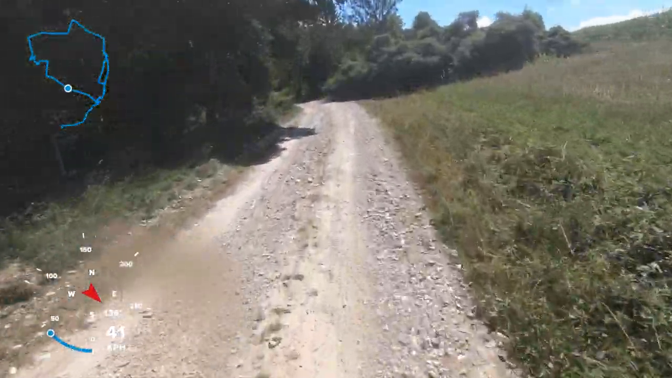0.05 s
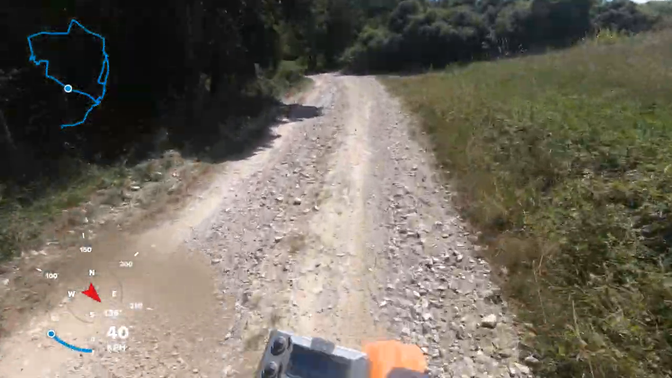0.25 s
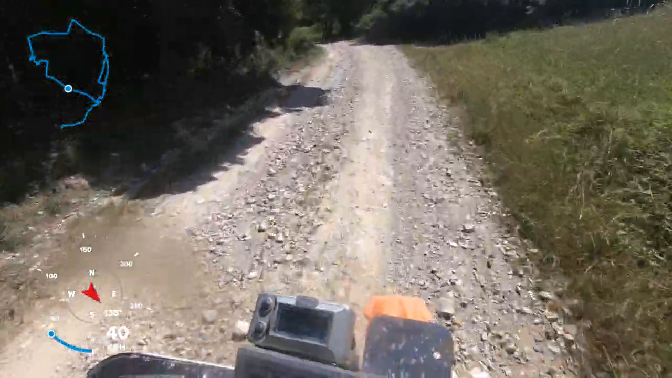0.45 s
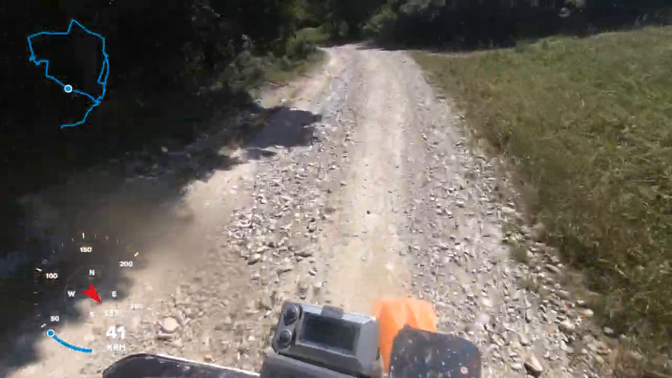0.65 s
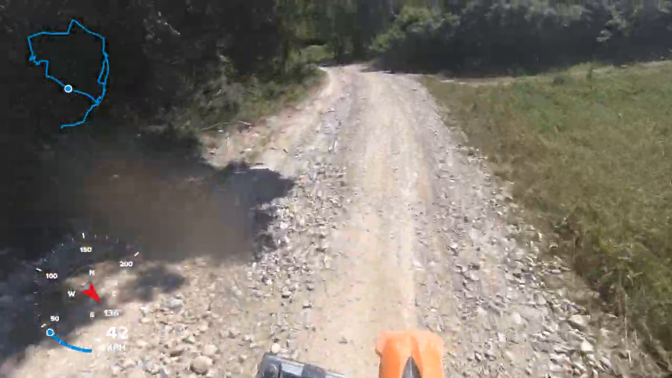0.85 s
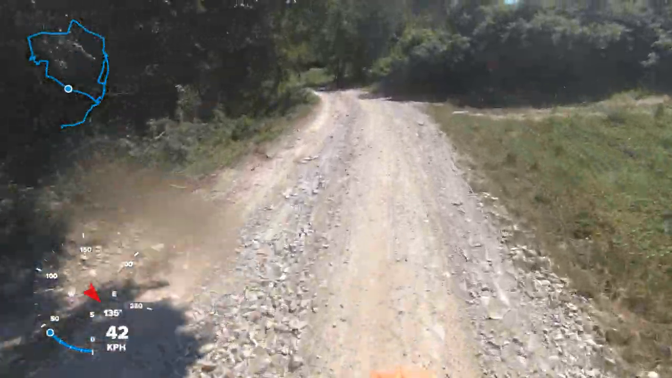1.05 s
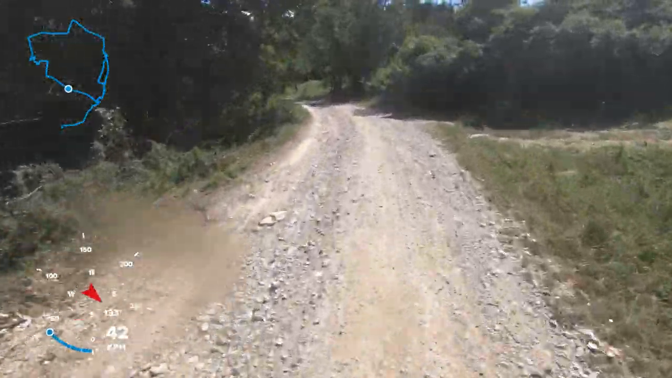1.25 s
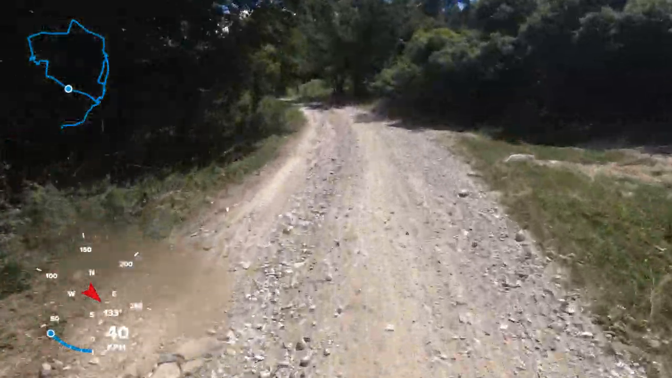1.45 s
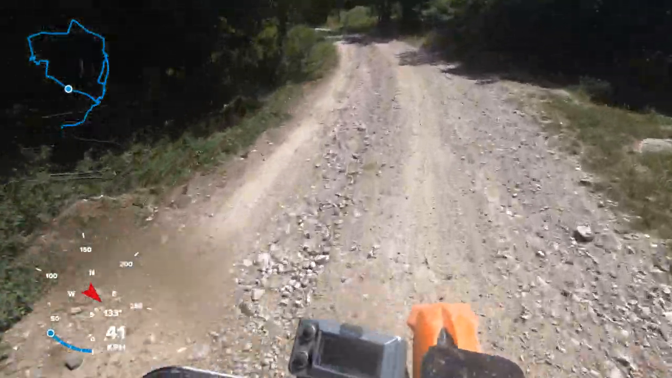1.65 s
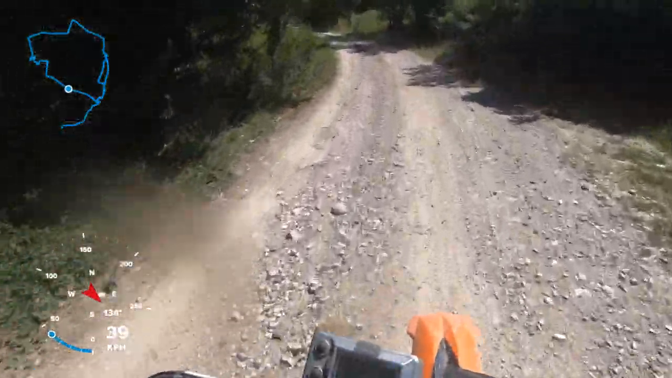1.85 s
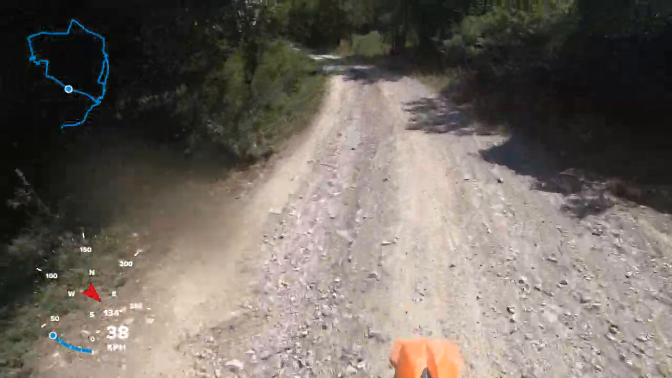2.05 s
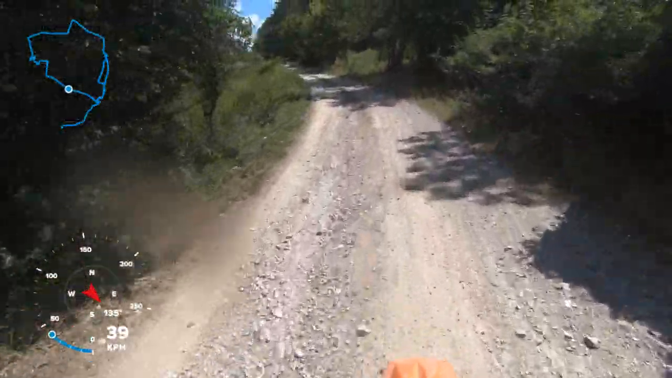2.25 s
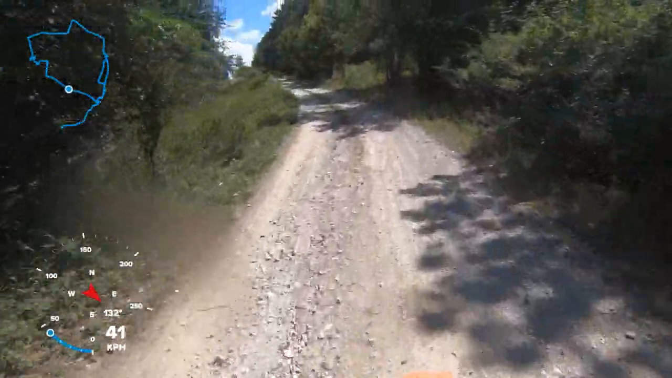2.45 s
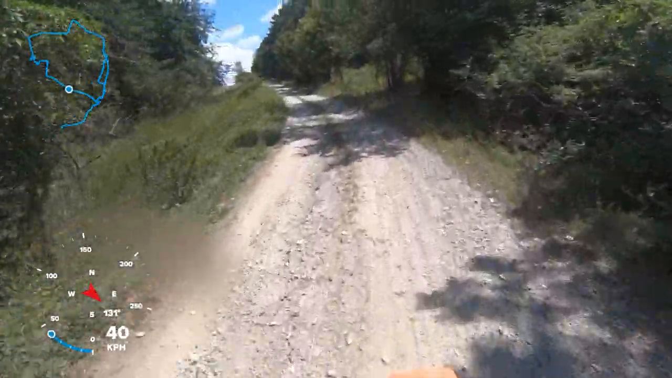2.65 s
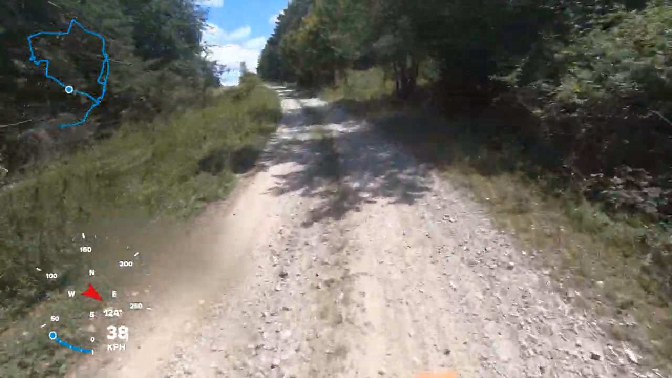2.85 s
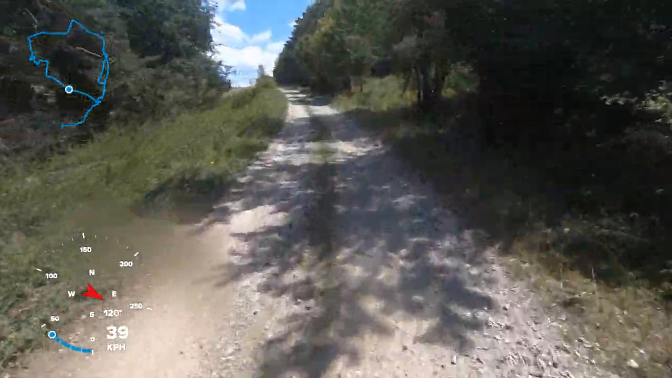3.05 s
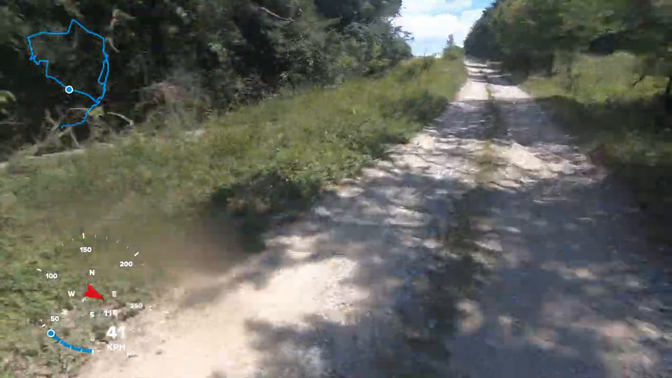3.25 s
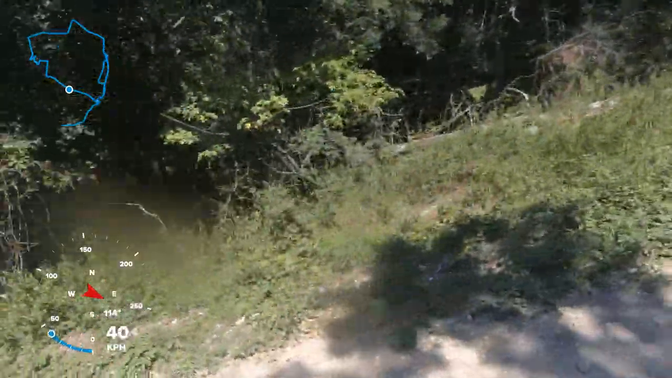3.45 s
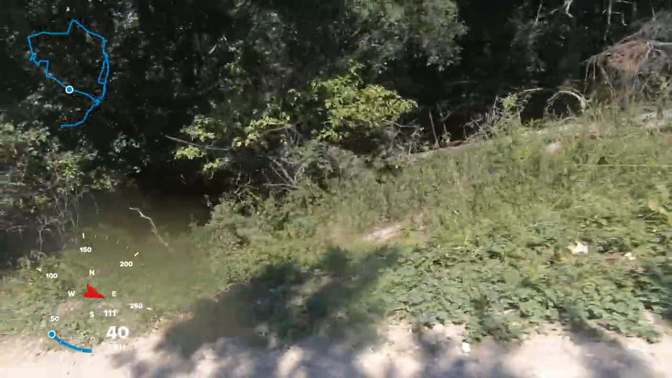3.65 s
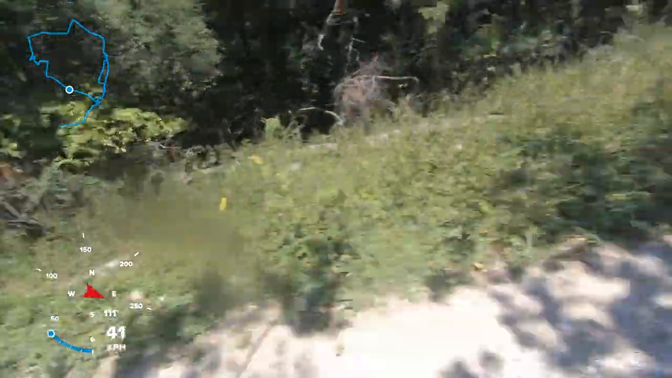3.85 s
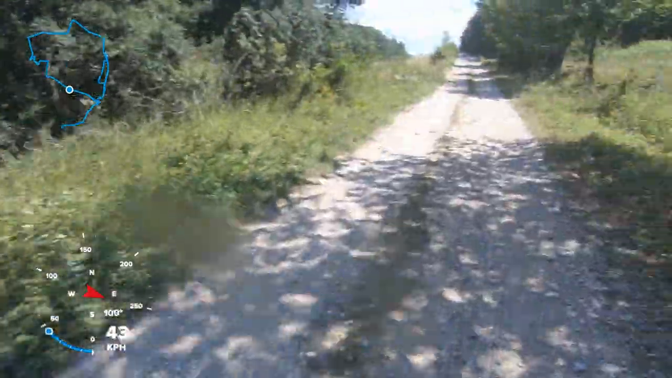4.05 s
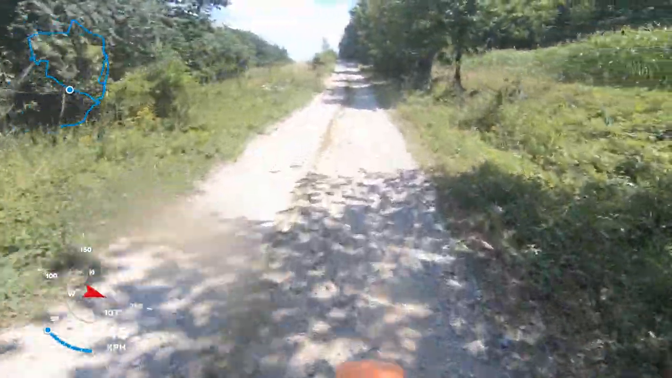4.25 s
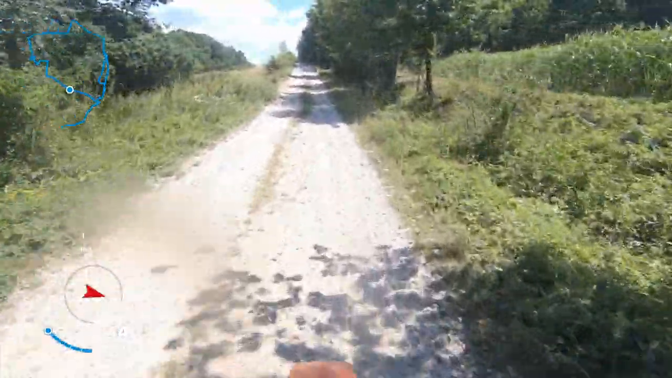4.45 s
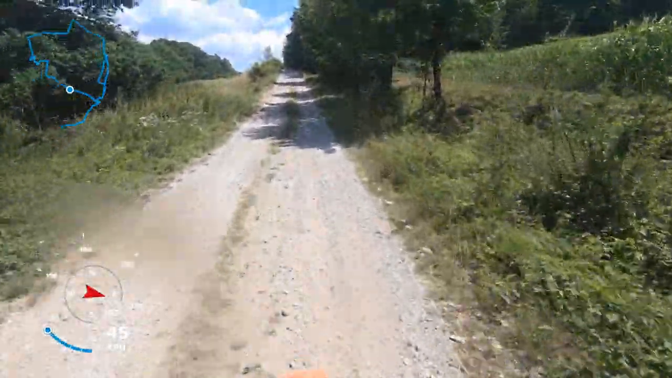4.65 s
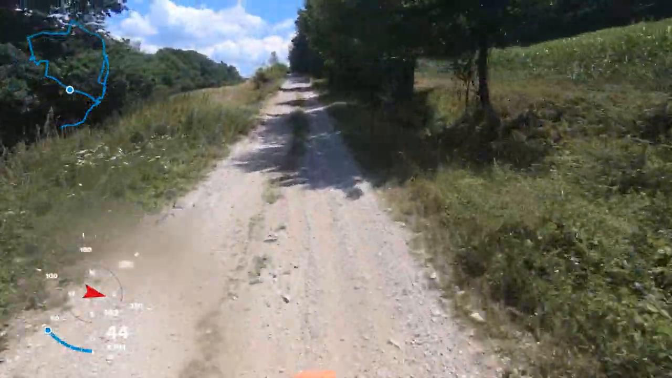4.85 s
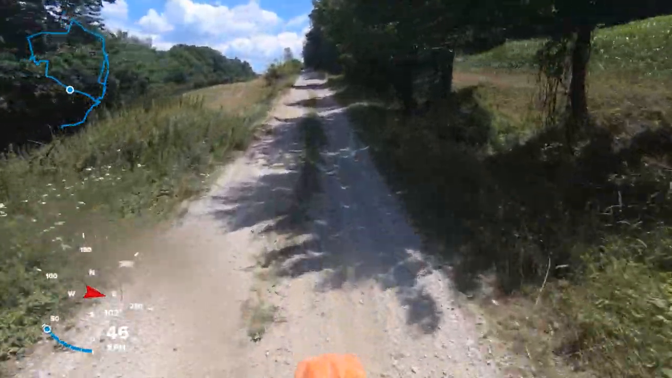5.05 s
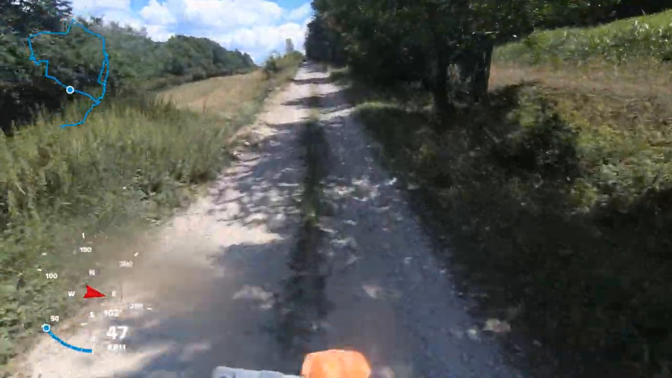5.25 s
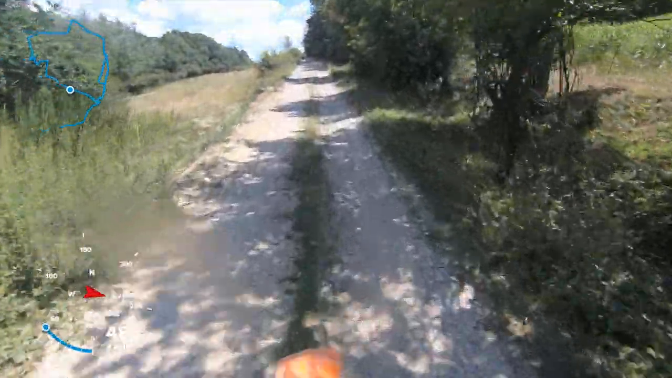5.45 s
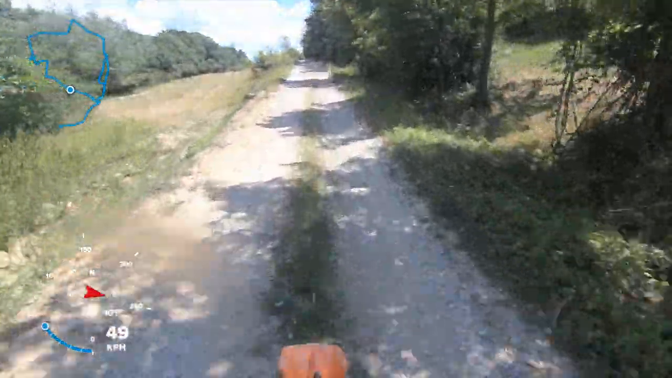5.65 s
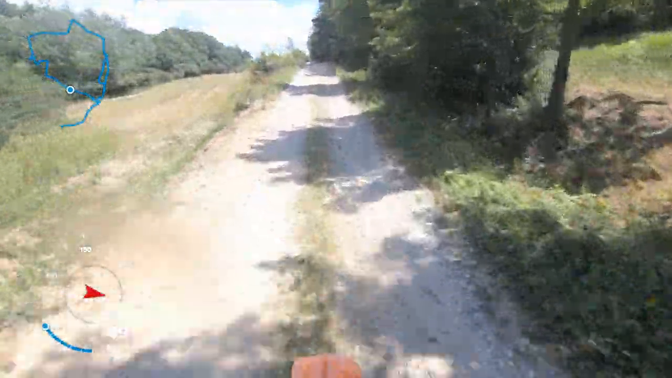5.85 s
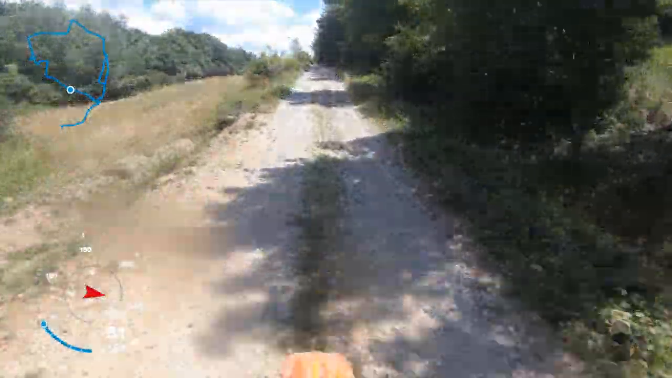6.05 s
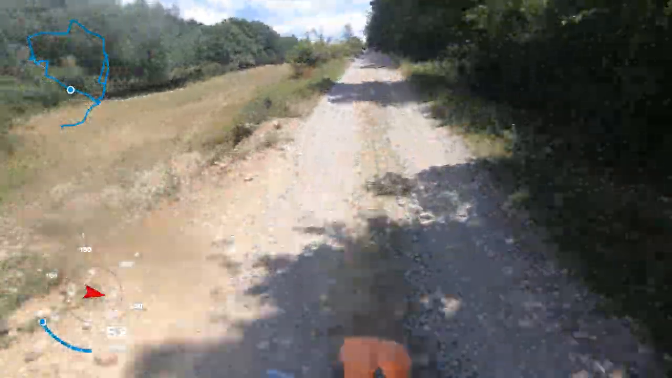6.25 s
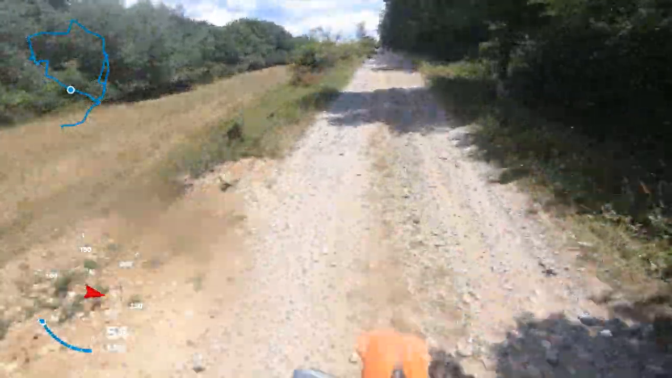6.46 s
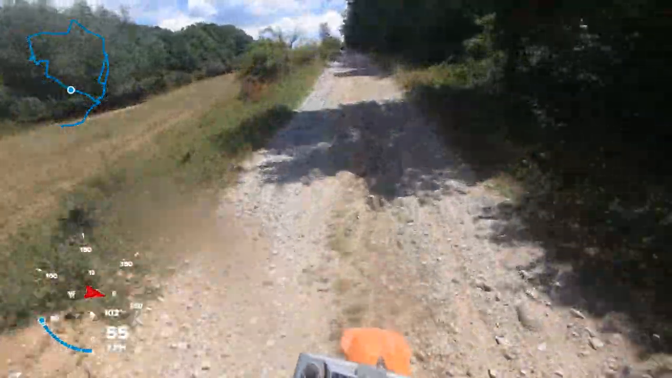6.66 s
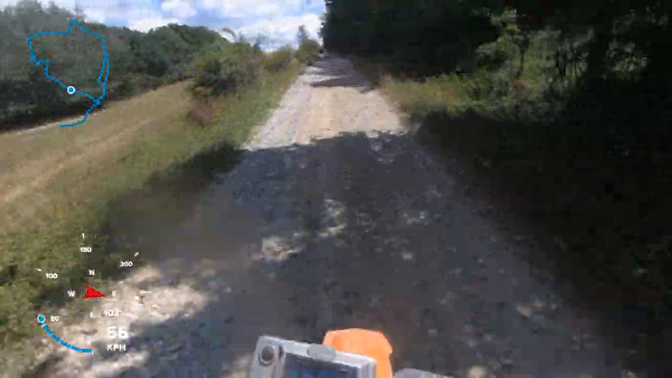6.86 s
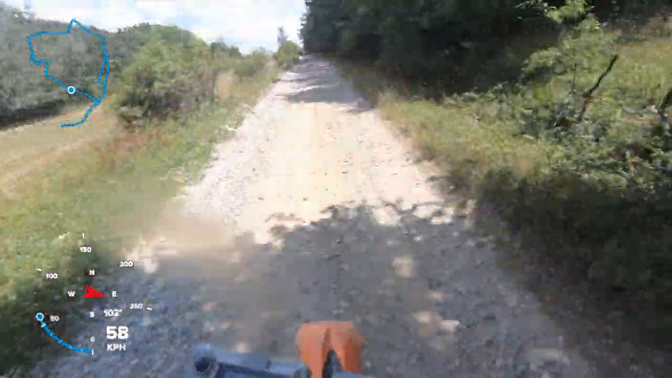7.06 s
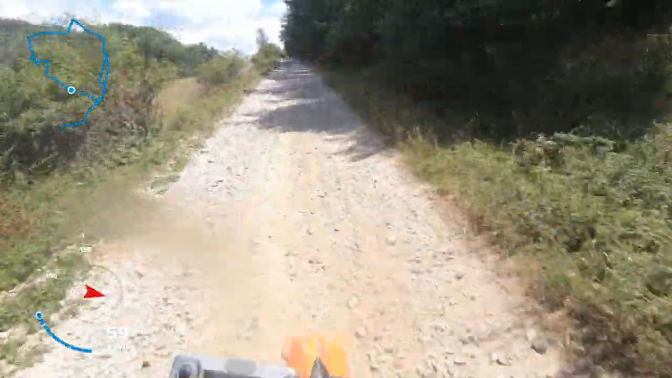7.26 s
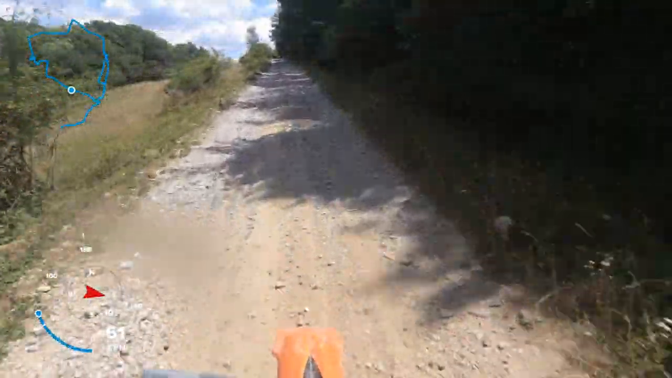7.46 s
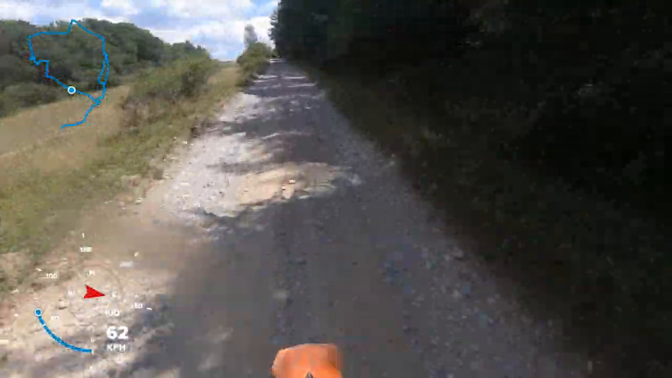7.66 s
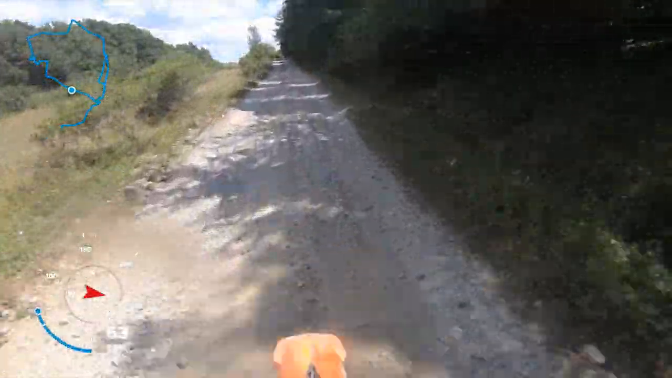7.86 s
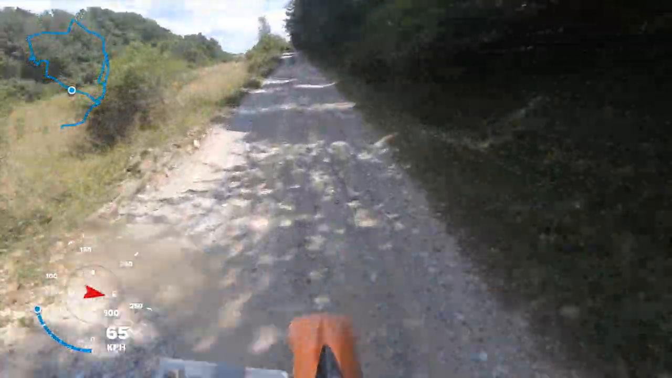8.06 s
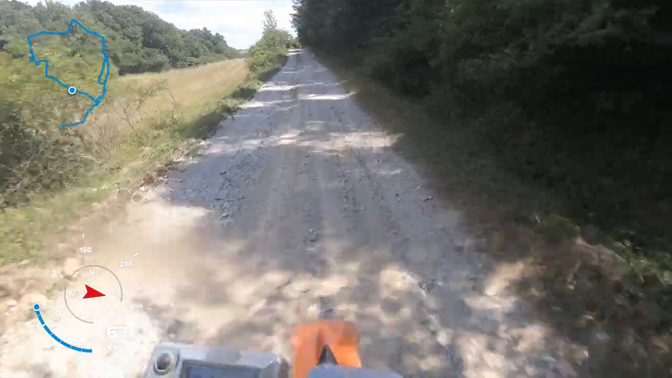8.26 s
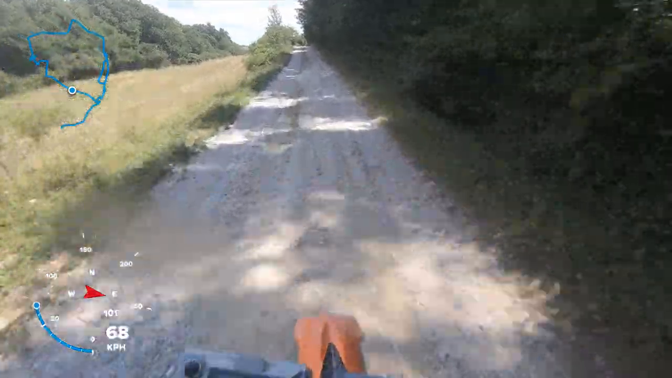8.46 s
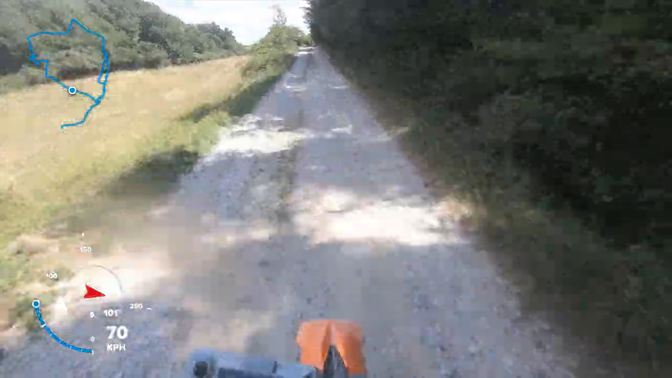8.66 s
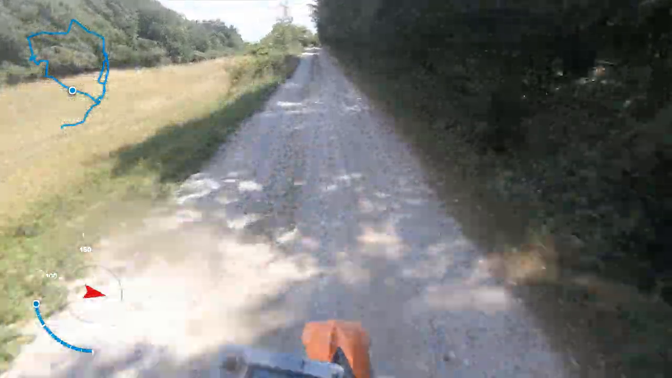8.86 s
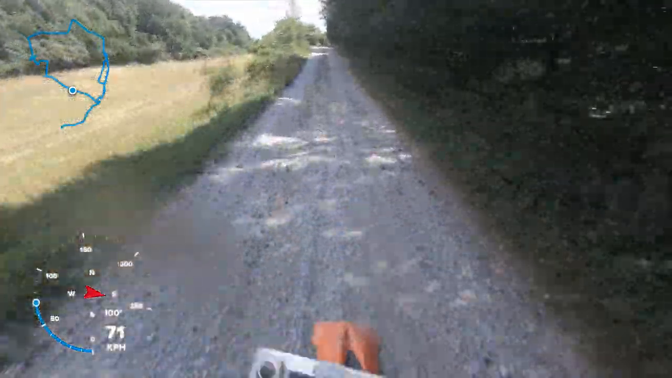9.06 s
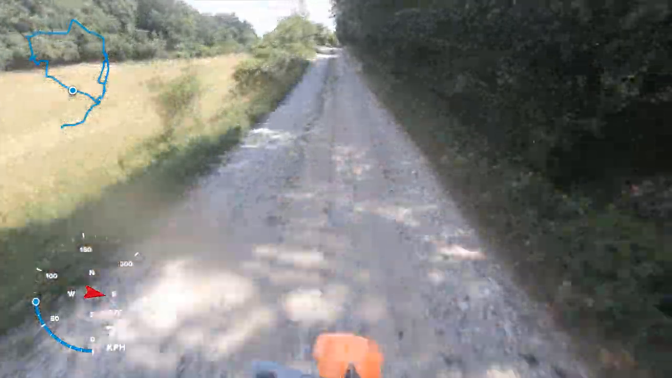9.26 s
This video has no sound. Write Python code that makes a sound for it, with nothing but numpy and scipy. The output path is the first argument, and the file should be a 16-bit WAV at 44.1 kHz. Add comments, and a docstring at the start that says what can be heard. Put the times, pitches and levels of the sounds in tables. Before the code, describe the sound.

A twin-cylinder motorcycle drones along a gravel track, then accelerates in steps to roughly double its revs, wind rumbling and buffeting around the rider's helmet.

```python
"""Motorcycle climbing through its revs

A twin-cylinder motorcycle on a gravel track is heard at two microphone ports on the rider's helmet.
Uneven firings ring the exhaust and the open intake; sines locked to the same turns add shake and drone.
A gear whine follows the engine's turns and a mechanical hiss beats with the firings.
Shaped noise makes the wind and its gusts, short clicks make the ticks, and a fast gain control
evens out the level."""
import sys
import numpy as np
from scipy import signal
from scipy.fft import rfft, irfft, next_fast_len
from scipy.io import wavfile
from scipy.ndimage import uniform_filter1d

SR = 44100
rng = np.random.default_rng(int(sys.argv[2]) if len(sys.argv) > 2 else 0)


def master_out(mix):
    """Clip the mix to full scale and print it as 16-bit PCM to the path in sys.argv[1]."""
    frames = np.transpose(np.atleast_2d(mix))
    ceiling = np.clip(frames, -1, 1)
    pcm = np.round(ceiling * 32767).astype(np.int16)
    wavfile.write(sys.argv[1], SR, pcm)


def nominal_scale(level):
    """Amplitude ratio for a level in decibels (scalar or array-like)."""
    x = np.asarray(level, float) / 20
    return 10 ** x


N = 410571
SIZE = next_fast_len(N + SR)   # room for filter tails
HZ = np.arange(SIZE // 2 + 1) * SR / SIZE + 1e-3   # kept above zero for the logarithm
TIME_S = np.arange(N) / SR


def rms_one(x):
    """Scale to rms 1."""
    return x / np.sqrt(np.mean(x ** 2) + 1e-20)


def in_time(rows):
    """Columns of a curve table, one value a sample."""
    s, *columns = np.transpose(rows)
    return [np.interp(TIME_S, s, column) for column in columns]


def at_hz(points, hz):
    """A spectrum table read on a log-frequency axis."""
    table_hz, value = np.transpose(points)
    return np.interp(np.log(hz), np.log(table_hz), value)


def drift(rate_hz):
    """Slow chance: noise through a double one-pole low-pass, spread 1."""
    r = np.exp(-40 * np.pi * rate_hz / SR)   # made at a twentieth of the sample rate
    slow = signal.lfilter([1], [1, -2 * r, r * r], rng.standard_normal(N // 20 + 4002))[4000:]
    return np.interp(np.arange(N) / 20, np.arange(len(slow)), rms_one(slow))


def coloured(x, spectrum):
    """Causal (minimum-phase) filter with the given dB shape, falling away beyond its ends."""
    shape = [(spectrum[0][0] / 2, -80)] + list(spectrum) + [(spectrum[-1][0] * 1.3, -100)]
    cepstrum = irfft(at_hz(shape, HZ) * np.log(10) / 20, SIZE)
    # folding the cepstrum forward in time makes the filter causal
    cepstrum[1:SIZE // 2] *= 2
    cepstrum[SIZE // 2 + 1:] = 0
    return irfft(rfft(x, SIZE) * np.exp(rfft(cepstrum)), SIZE)[..., :N]


def stereo_noise(spectrum, flicker_db, flicker_hz):
    """Two unrelated noises of one colour that flicker together."""
    noise = rms_one(coloured(rng.standard_normal((2, N)), spectrum))
    return noise * nominal_scale(flicker_db * drift(flicker_hz))


def firings(turn, second_share, second_db, uneven_db, jitter):
    """Two pulses a cycle, each a little early or late (jitter in cycles) and of its own strength."""
    cycles = np.arange(int(turn[-1]))
    chance = rng.standard_normal((len(cycles), 4))
    pulses = np.zeros(N)
    for k, (share, level_db) in enumerate([(0, 0), (second_share, second_db)]):
        at = np.searchsorted(turn, cycles + share + jitter * chance[:, k])
        pulses[np.clip(at, 0, N - 1)] += nominal_scale(level_db + uneven_db * chance[:, 2 + k])
    return pulses


def puffs(pulses, decay_s):
    """An envelope that swells quickly at each firing and dies away, mean about 1."""
    r = np.exp(-1 / (decay_s * SR))
    shape = signal.lfilter([1], [1, -2 * r, r * r], pulses)
    return shape / uniform_filter1d(shape, size=4000)


def in_step(x, angle, smooth_s):
    """A sine of rms 1 on the given angle that keeps the phase this order already has in x."""
    seen = signal.lfilter([1], [1, -np.exp(-1 / (smooth_s * SR))], x * np.exp(-1j * angle))
    return np.sqrt(2) * np.cos(angle + np.angle(seen))


# engine speed: [start_s, four_stroke_cycles_per_s]
SPEED = [(0.0, 28.9), (0.13, 29.1), (0.23, 28.5), (0.31, 29.2), (0.54, 29.9), (0.72, 29.3), (1.11, 26.7),
         (1.84, 26.3), (2.41, 27.3), (2.64, 28.2), (2.95, 27.3), (3.16, 27.2), (3.32, 27.7), (3.53, 27.1),
         (3.97, 30.0), (4.28, 30.0), (4.64, 34.6), (4.82, 34.5), (4.93, 35.4), (5.03, 34.0), (5.13, 34.3),
         (5.31, 37.4), (5.47, 36.3), (5.86, 36.9), (6.04, 36.8), (6.56, 41.1), (6.66, 41.8), (6.84, 39.8),
         (6.95, 41.4), (7.23, 42.1), (7.31, 43.3), (7.44, 43.6), (7.68, 49.4), (7.88, 49.8), (7.93, 50.2),
         (8.09, 53.9), (8.22, 53.3), (8.4, 54.1), (8.51, 52.1), (8.61, 54.6), (8.68, 54.1), (8.92, 58.7),
         (9.08, 58.2), (9.23, 59.9), (9.31, 59.4)]


def engine_speed():
    """Four-stroke cycles per second: one cycle is two turns of the crank."""
    return in_time(SPEED)[0]


# the rider looks aside and back: [turn_begins_s, fully_turned_s, turning_back_s, ahead_again_s]
GLANCE_TIMES = [3.42, 3.599, 3.8, 3.928]
# the turned helmet shades the exhaust and catches the wind
GLANCE_EXHAUST_DB, GLANCE_WIND_DB = -13, 9
GLANCE_WHINE_DB, GLANCE_HISS_DB, GLANCE_CRANK_DB = -5, -3, -4


def glance():
    """How far the helmet is turned: 0 ahead, 1 fully aside."""
    return np.interp(TIME_S, GLANCE_TIMES, [0, 1, 1, 0])


# spectrum of the low wind rumble: [pitch_hz, level_db]
RUMBLE_COLOUR = [(18, -3), (30, -6), (50, -1.5), (80, -6), (130, -4)]


def rumble(octaves):
    """Low wind rumble: deep noise that grows with engine speed, 9 dB an octave."""
    return nominal_scale(-34.5 + 9 * octaves) * stereo_noise(RUMBLE_COLOUR, flicker_db=1.0, flicker_hz=1.4)


# strength of the wind: [start_s, buffeting_level_db, airflow_level_db]
WIND_LEVEL = [(0, -24.5, -44), (.5, -20.5, -39), (.9, -21, -43.5), (1.4, -23.5, -43.5), (1.9, -25.5, -43.5),
              (2.3, -26.5, -42.5), (2.9, -25, -44.5), (3.4, -26.5, -44), (4.2, -26, -40), (4.6, -25.5, -39),
              (5, -24.5, -38.5), (5.4, -24, -41), (5.9, -23.5, -40), (6.6, -21, -38), (7.0, -23.5, -40),
              (7.4, -23, -38), (7.8, -22.5, -36.5), (8.3, -21, -36), (9.31, -18, -35)]
# spectrum of the buffeting: [pitch_hz, level_db]
BUFFET_COLOUR = [(12, -45.5), (20, -19), (43, -2.5), (129, -2.5), (164, -5), (437, -15), (594, -18.5),
                 (782, -25.5), (1100, -31.5), (1200, -49.5), (1560, -70.5), (2640, -120)]
# spectrum of the airflow's hiss: [pitch_hz, level_db]
AIRFLOW_COLOUR = [(300, -17), (500, -9), (800, -9.5), (1200, -16), (2000, -24), (3500, -33)]


def wind(aside):
    """Wind at the ports: low noise for the buffeting, higher noise for the airflow."""
    buffet_db, flow_db = in_time(WIND_LEVEL)
    buffet_gain = nominal_scale(buffet_db + GLANCE_WIND_DB * aside)
    buffet = buffet_gain * stereo_noise(BUFFET_COLOUR, flicker_db=1.0, flicker_hz=6.3)
    flow = nominal_scale(flow_db) * stereo_noise(AIRFLOW_COLOUR, flicker_db=1.0, flicker_hz=25.7)
    return buffet + flow


# strength of the topmost hiss: [start_s, level_db]
TREBLE_LEVEL = [(0.05, -97), (0.15, -80), (1.0, -77.5), (1.23, -88), (2.69, -83), (3.76, -99),
                (4.38, -77.5), (6.79, -72), (7.63, -76.5), (9.25, -69.5)]
# its spectrum: [pitch_hz, level_db]
TREBLE_COLOUR = [(6000, -12), (8000, -20), (10000, 4.5), (12500, -6), (15700, -21)]


def treble_air():
    """The top of the hiss: flickering high noise."""
    return nominal_scale(in_time(TREBLE_LEVEL)[0]) * stereo_noise(TREBLE_COLOUR, flicker_db=.8, flicker_hz=12.0)


# gusts that strike the left port: [start_s, length_s, level_db, extra_brightness_db]
GUST_LIST = [(0.147, 0.056, -37, 4.5), (0.929, 0.13, -26, 4), (1.122, 0.018, -32.5, 7),
             (1.22, 0.024, -31.5, 2), (1.26, 0.025, -23.5, 2), (1.313, 0.053, -29, -0.5),
             (1.416, 0.046, -31, -4), (1.715, 0.48, -25.5, -9), (2.112, 0.49, -34.5, 0),
             (2.6, 0.06, -29.5, 2), (2.958, 0.063, -30, -9), (3.079, 0.075, -31, 5),
             (3.164, 0.03, -30.5, 8), (3.252, 0.4, -34, 3.5), (3.836, 0.3, -27.5, -4.5),
             (6.946, 0.14, -31, 8.5), (7.052, 0.098, -26.5, 6.5), (7.141, 0.13, -31, 9.5)]
# spectrum of a gust at the left port: [pitch_hz, level_db]
GUST_COLOUR = [(140, -17.5), (220, -1), (350, 0.5), (500, 0), (750, -10), (1100, -14.5), (1600, -23),
               (2500, -29.5), (3500, -35)]
# spectrum of the crackling grains: [pitch_hz, level_db]
GRIT_COLOUR = [(600, -6), (900, 5), (1400, 3), (2000, -14), (2800, -21.5)]
# filter on what the right port hears of a gust: [pitch_hz, gain_db]
LEAK_TO_RIGHT = [(300, -9.5), (600, -3), (900, -4), (1500, 1.5), (2500, -5)]
GUST_RISE_S, GUST_FALL_S = .014, .022
GUST_TOP_HZ = 750   # the extra brightness acts above this
GUST_LIKENESS = -.6   # the right port hears a gust largely inverted
GRIT_PER_S, GRIT_DB = 460, -16.5


def gusts():
    """Each gust rises fast, holds and falls away, lumpy and gritty; the right port hears it filtered."""
    shapes = []
    for start_s, length_s, *_ in GUST_LIST:
        rise = (TIME_S - start_s) / GUST_RISE_S
        fall = 1 + (start_s + length_s - TIME_S) / GUST_FALL_S
        shapes.append(np.clip(np.minimum(rise, fall), 0, 1))
    shapes = np.array(shapes)
    level_db, bright_db = np.array(GUST_LIST)[:, 2:].T[:, :, None]
    body_gain = np.max(nominal_scale(level_db) * shapes, axis=0)
    top_gain = np.max(nominal_scale(level_db + bright_db) * shapes, axis=0)

    noise = stereo_noise(GUST_COLOUR, flicker_db=2.0, flicker_hz=45.0)
    low_pass = signal.butter(2, GUST_TOP_HZ, fs=SR, output="sos")
    body = signal.sosfiltfilt(low_pass, noise)
    left, other = body_gain * body + top_gain * (noise - body)

    # grains at random moments, a few far stronger than the rest
    struck = rng.random(N) < GRIT_PER_S / SR
    grains = struck * rng.standard_normal(N) * nominal_scale(5.5 * rng.exponential(1, N))
    left = left + nominal_scale(GRIT_DB) * top_gain * rms_one(coloured(grains, GRIT_COLOUR))

    right = GUST_LIKENESS * left + np.sqrt(1 - GUST_LIKENESS ** 2) * other
    right = irfft(rfft(right, SIZE) * nominal_scale(at_hz(LEAK_TO_RIGHT, HZ)), SIZE)[:N]
    return np.array([left, right])


# the louder treble ticks: [start_s, click_level_db]
LOUD_TICKS = [(0.5113, -50), (0.9747, -50), (2.0293, -51.5), (3.2306, -50.5), (3.3473, -50), (5.9494, -43),
              (6.7007, -47), (7.434, -49)]
FIRST_TICK_S, TICK_PERIOD_S = .028, 1001 / 12000   # the faint steady ticking


def ticks():
    """Dry clicks, high treble only: a faint steady ticking of uneven size and some louder ones."""
    clicks = np.zeros(N)
    clock = np.arange(FIRST_TICK_S, N / SR, TICK_PERIOD_S)
    clicks[(clock * SR).astype(int)] = nominal_scale(-55 + 3.0 * rng.standard_normal(len(clock)))
    for start_s, level_db in LOUD_TICKS:
        clicks[round(start_s * SR)] = nominal_scale(level_db)
    return signal.sosfilt(signal.butter(2, [8000, 16000], "band", fs=SR, output="sos"), clicks)


# strength of the mechanical hiss: [start_s, level_db]
HISS_STRENGTH = [(0, -48.5), (.55, -46.5), (.95, -48), (1.1, -52.5), (2.8, -49.5), (3.1, -54.5),
                 (3.4, -51.5), (4, -49), (5.65, -44), (6, -45.5), (6.25, -44.5), (7.4, -43), (7.6, -45),
                 (9.31, -47)]
# its spectrum: [pitch_hz, level_db]
HISS_COLOUR = [(800, -14.5), (1300, -8), (1700, -3.5), (2100, -4.5), (2450, -7), (2850, -4), (3400, -9.5),
               (4000, -9), (4600, -13.5), (5300, -9.5), (6100, -6), (7000, -14.5), (8000, -20.5),
               (10000, -35)]


def mechanical_hiss(beat, aside):
    """Noise from the moving parts that swells a little with each firing."""
    level_db = in_time(HISS_STRENGTH)[0] + GLANCE_HISS_DB * aside + 0.88 * drift(2.5)
    swell = 1 + 0.27 * (beat - 1)
    return nominal_scale(level_db) * swell * stereo_noise(HISS_COLOUR, flicker_db=0.9, flicker_hz=42.0)


# gear whine: [start_s, level_db, thin_tone_against_rough_band (ratio)]
WHINE_LEVEL = [(0, -45.5, 0.7), (.3, -44.5, 0.93), (.6, -45, .8), (.85, -46, 0.65), (1.0, -50, 0.62),
               (1.15, -46, 0.68), (1.5, -47.5, 1.1), (2.1, -47, 0.81), (2.6, -45.5, 0.49), (2.8, -46, 1),
               (2.9, -50, .7), (3.45, -49.5, 1.3), (3.95, -44, 0.8), (4.3, -43.5, 0.66),
               (4.55, -41.5, 0.63), (5.15, -45.5, 1.2), (5.27, -45.5, 0.84), (5.6, -48, 0.65),
               (6.1, -41.5, 0.71), (6.5, -45.5, .8), (6.9, -42.5, 0.62), (7.4, -47, 0.67), (7.55, -47, .11),
               (7.85, -40.5, .05), (8.05, -51.5, .05), (9.31, -52, .05)]
# its pitch strays as the drive line loads and slackens: [start_s, whine_cycles_per_engine_cycle]
MESH_RATIO = [(0, 70.5), (.6, 69.5), (1.0, 70), (2.1, 69), (2.76, 68), (2.8, 74), (2.85, 74), (2.89, 68),
              (3.45, 71), (4.3, 72), (4.55, 70), (5.18, 69.5), (5.24, 74), (5.31, 71.7), (5.47, 73),
              (6.1, 72), (6.25, 71), (6.5, 71.5), (6.9, 70.5), (7.45, 71), (7.85, 69), (8.05, 72),
              (9.31, 71)]
# how the gear case colours it: [pitch_hz, gain_db]
CASE_COLOUR = [(1500, -9.5), (1830, -8.5), (2050, -5), (2350, -10.5), (2500, -6.5), (2680, 0), (2850, -3.5),
               (3050, -0.5), (3250, -8), (3700, -9), (4500, -16)]
GEAR_RATTLE_DB = -8.5   # a wide rattle takes over where the tone fails


def gear_whine(turn, beat, aside):
    """Tooth mesh tied to the engine's turns: a thin tone in a rough band, swelling as firings load it."""
    level_db, tone = in_time(WHINE_LEVEL)
    ratio = in_time(MESH_RATIO)[0]
    mesh = 2 * np.pi * np.cumsum(ratio * np.gradient(turn)) + .5 * np.sin(2 * np.pi * turn)
    rough = drift(210.0) * np.sin(mesh) + drift(160.0) * np.cos(mesh)
    wide = drift(400.0) * np.sin(mesh) + drift(400.0) * np.cos(mesh)
    rattle = nominal_scale(GEAR_RATTLE_DB) * np.clip(1 - 2 * tone, 0, 1) * wide
    thin = tone * np.sin(mesh + .8 * drift(31.0))
    whine = (rough + rattle + thin) * (1 + .4 * (beat - 1))
    return coloured(nominal_scale(level_db + GLANCE_WHINE_DB * aside) * whine, CASE_COLOUR)


# spectrum of the intake's sharp edge: [pitch_hz, level_db]
BARK_COLOUR = [(400, -10), (480, -4), (570, -9), (670, -8), (800, -10), (1000, -10), (1200, -7),
               (1350, -12), (1500, -24)]


def intake_bark(gulps, octaves, aside):
    """The sharp edge of each intake pulse opens up with the revs, 7 dB an octave."""
    level_db = -53 + 7 * octaves + GLANCE_EXHAUST_DB * aside
    return nominal_scale(level_db) * rms_one(coloured(gulps, BARK_COLOUR))


# the shake's second harmonic against its first: [start_s, level_db]
SHAKE_OVERTONE = [(0, -12), (1.5, -18), (2.3, -10), (3.4, -5.5), (4.2, -19), (6, -11), (9.31, -12)]


def crank_shake(exhaust, angle):
    """Crank imbalance: a sine once a crank turn, in step with the exhaust, and its second harmonic."""
    overtone = nominal_scale(in_time(SHAKE_OVERTONE)[0]) * np.sqrt(2) * np.sin(2 * angle)
    return in_step(exhaust, angle, smooth_s=.1) + overtone


def intake_drone(exhaust, turn):
    """Eight waves a cycle, strong under load; seven a cycle sound 5 dB below."""
    eighth = in_step(exhaust, 16 * np.pi * turn, smooth_s=.04)
    seventh = in_step(exhaust, 14 * np.pi * turn, smooth_s=.04)
    return eighth + nominal_scale(-5) * seventh


# engine load, levels going into the mix:
# [start_s, crank_shake_db, intake_drone_db, exhaust_db, open_throttle_roar_db, once_a_cycle_thump_db]
ENGINE_LOAD = [(0, -28, -44, -23.5, -39.5, -40), (.8, -25, -60, -23.5, -35, -57),
               (1.05, -25.5, -34, -32.5, -49, -38), (1.6, -26, -65, -21.5, -28.5, -47),
               (2.4, -27.5, -54, -23, -41, -42), (3.3, -30.5, -56, -28, -59, -40),
               (3.95, -23.5, -36, -31, -42.5, -44.5), (4.3, -26.5, -33.5, -25.5, -38.5, -39),
               (4.7, -22, -38.5, -24.5, -46, -41), (5.15, -24, -52.5, -22.5, -35.5, -29),
               (6.1, -24.5, -40.5, -25.5, -35, -27.5), (6.4, -26.5, -33, -28.5, -34, -31.5),
               (6.7, -24.5, -32.5, -27.5, -34, -27), (7.0, -25.5, -36.5, -28.5, -34.5, -32),
               (7.3, -24, -33.5, -28, -35, -26.5), (7.6, -24.5, -47, -27, -36.5, -29),
               (7.85, -25, -47, -37, -32.5, -39), (8.1, -26, -56, -38, -32.5, -28.5),
               (8.7, -23, -45, -40, -33, -29), (9.31, -27, -49.5, -39, -40.5, -33)]
# exhaust pipe and silencer: [pitch_hz, level_db]
PIPE_COLOUR = [(25, -23), (55, -16.5), (90, -8), (135, 2), (162, 1.5), (190, -6), (215, -8), (260, 0.5),
               (300, 0), (345, -15.5), (480, -18.5), (700, -34), (1100, -41), (2000, -52)]
# air-box resonances that sound under open throttle: [pitch_hz, level_db]
AIR_BOX = [(150, -25), (200, -7.5), (260, -4), (300, -0.5), (340, -7), (400, -6), (440, -6.5), (480, -5),
           (540, -13.5), (600, -17.5), (670, -2), (740, -15), (900, -28.5)]


def engine(pulses, gulps, turn, aside):
    """Firings ring the pipe and the air box; shake, drone and thump ride on the same turns."""
    crank_db, drone_db, exhaust_db, roar_db, thump_db = in_time(ENGINE_LOAD)
    angle = 4 * np.pi * turn + .2 * drift(5.0)   # two crank turns a cycle
    exhaust = nominal_scale(exhaust_db) * rms_one(coloured(pulses, PIPE_COLOUR))
    exhaust += nominal_scale(roar_db) * rms_one(coloured(gulps, AIR_BOX))
    thump = np.sqrt(2) * np.sin(angle / 2)   # the uneven firing rocks the frame once a cycle
    total = nominal_scale(crank_db + GLANCE_CRANK_DB * aside) * crank_shake(exhaust, angle)
    total += nominal_scale(thump_db) * thump
    total += nominal_scale(drone_db) * intake_drone(exhaust, turn)
    total += nominal_scale(GLANCE_EXHAUST_DB * aside) * exhaust
    return -total   # each firing peaks upward


# how far the left port leads: [pitch_hz, lead_radians]
PORT_LEAD = [(0, 0), (340, 0.2), (600, 3.1), (1290, 2.6), (1980, 6.8), (2580, 5.9), (3270, 7.0),
             (4480, 6.9), (5250, 6.4), (6200, 7.9)]
# left port's level minus the right's: [pitch_hz, difference_db]
PORT_TILT = [(60, -3.5), (100, -5), (170, -5.5), (300, -12), (500, -14.5), (860, -3.5), (1460, 3),
             (2490, 1), (4230, -2), (7210, 0.5), (9000, 3), (12000, 2.5)]
# share of noise common to both ports: [pitch_hz, share_0_to_1]
PORT_LIKENESS = [(30, 1), (120, 0.88), (250, 0.74), (500, 0.47), (1000, 0.75), (2000, 0.47), (4000, 0.73),
                 (8000, 0.2), (12000, 0.3)]


def ports(shared, own):
    """The left port hears the sound tilted and shifted; part of its noise is its own."""
    hz, radians = np.transpose(PORT_LEAD)
    alike = np.clip(at_hz(PORT_LIKENESS, HZ), 0, 1)
    tilt = nominal_scale(at_hz(PORT_TILT, HZ) / 2)
    clean, noise, other = rfft([shared, *own], SIZE)
    left = clean + alike * noise + np.sqrt(1 - alike ** 2) * other
    left = left * tilt * np.exp(1j * np.interp(HZ, hz, radians))
    right = (clean + noise) / tilt
    return irfft([left, right], SIZE)[:, :N]


def scene():
    """Engine tones reach both ports alike; wind and hiss only partly."""
    cycle_hz = engine_speed()
    octaves = np.log2(cycle_hz / 28)   # revs above 28 cycles per second
    turn = np.cumsum(cycle_hz) / SR
    aside = glance()
    # the second cylinder follows after this share of the cycle, at the exhaust and at the intake
    pulses = firings(turn, second_share=.388, second_db=2, uneven_db=1, jitter=.0018)
    gulps = firings(turn, second_share=.375, second_db=1.5, uneven_db=1, jitter=.002)
    beat = puffs(pulses, decay_s=0.0052)
    noises = rumble(octaves) + wind(aside) + treble_air() + mechanical_hiss(beat, aside)
    tones = ticks() + gear_whine(turn, beat, aside) + engine(pulses, gulps, turn, aside)
    bark = intake_bark(gulps, octaves, aside)   # arrives in step at both ports
    return ports(tones, noises) + gusts() + bark


def top_cut(x):
    """Nothing passes above the cut-off."""
    return signal.sosfilt(signal.butter(12, 15720, fs=SR, output="sos"), x)


def record(dry):
    """A fast gain control pulls down whatever rises over its threshold; peaks are rounded."""
    power = uniform_filter1d(np.mean(dry ** 2, axis=0), size=2200)   # over about 50 ms
    level_db = 10 * np.log10(power + 1e-12)
    held = dry * nominal_scale(-.6 * np.maximum(level_db + 22.0, 0))   # 0.6 dB down per dB above -22 dB
    return top_cut(0.41 * np.tanh(held / 0.42))


dry = scene()
out = record(dry)
master_out(out)
```